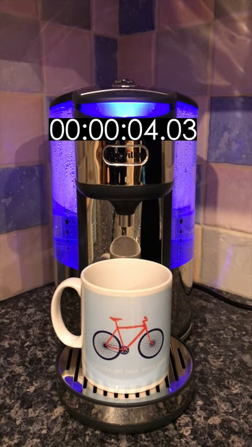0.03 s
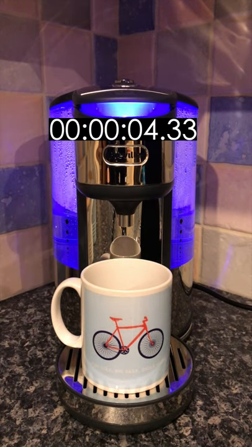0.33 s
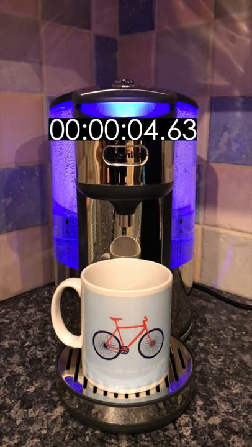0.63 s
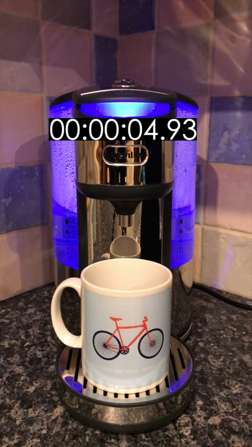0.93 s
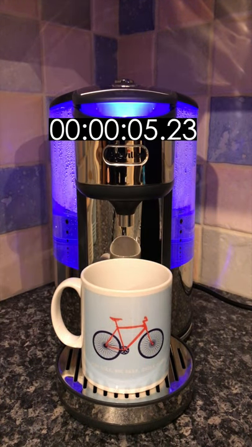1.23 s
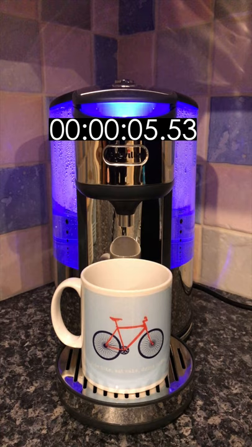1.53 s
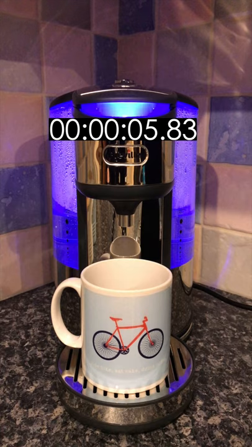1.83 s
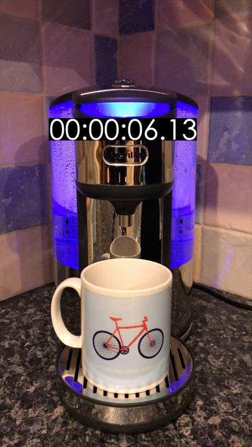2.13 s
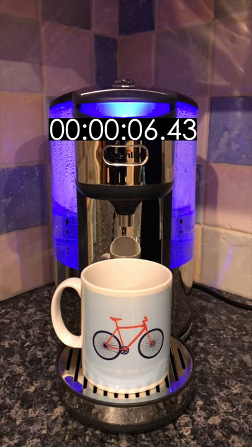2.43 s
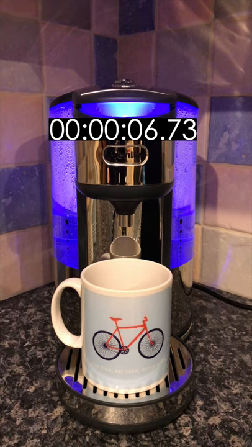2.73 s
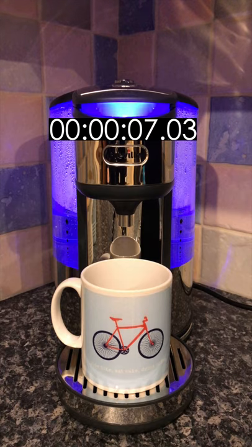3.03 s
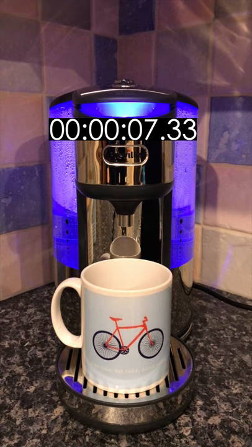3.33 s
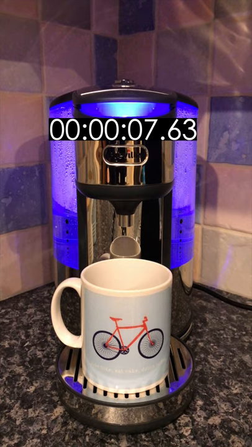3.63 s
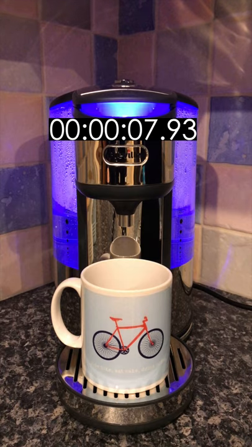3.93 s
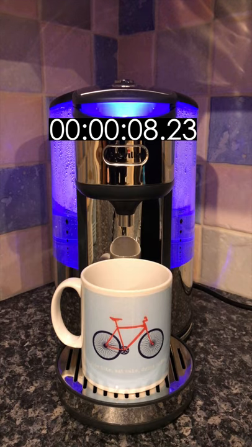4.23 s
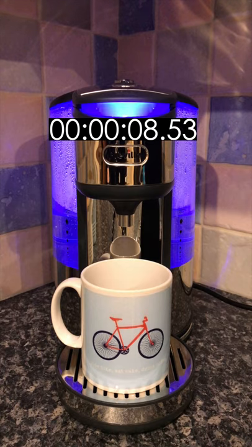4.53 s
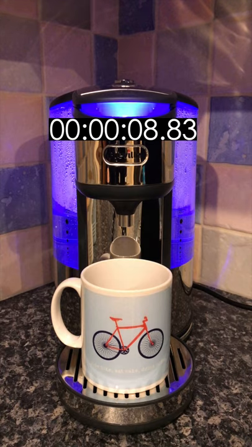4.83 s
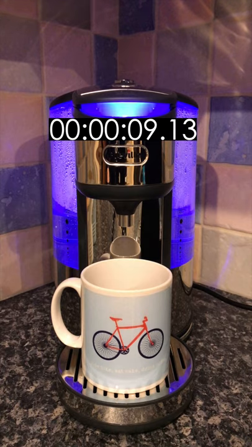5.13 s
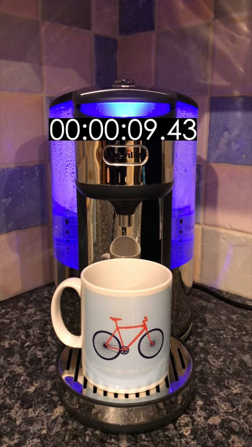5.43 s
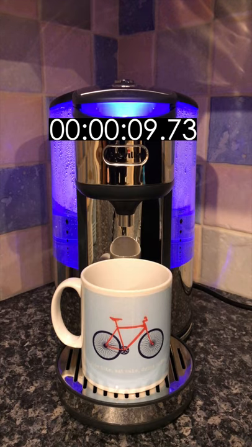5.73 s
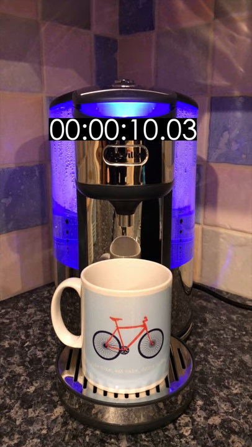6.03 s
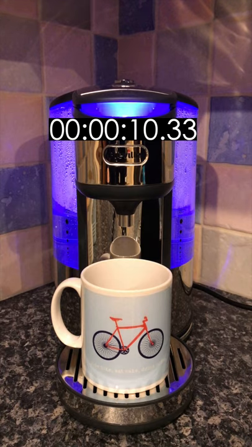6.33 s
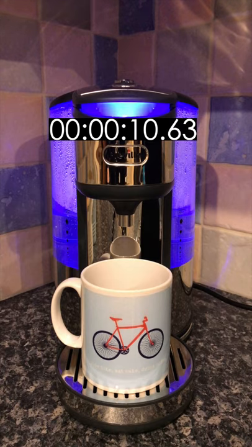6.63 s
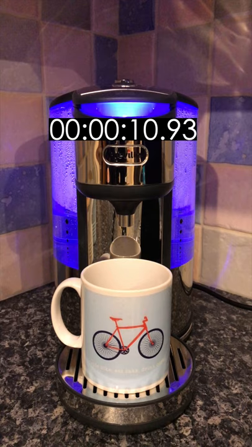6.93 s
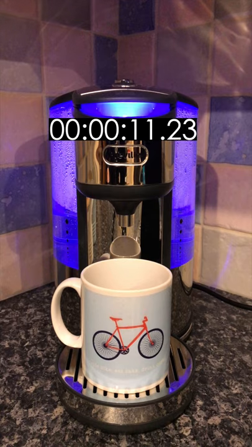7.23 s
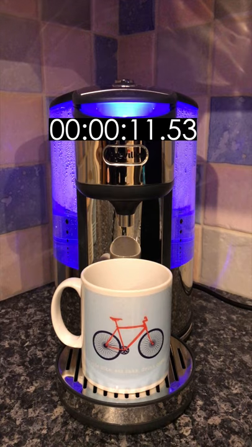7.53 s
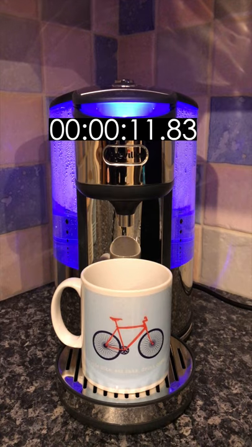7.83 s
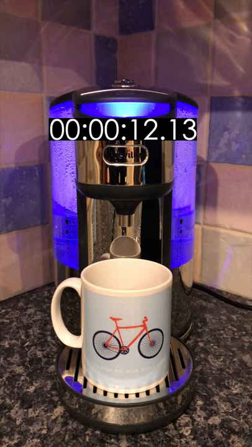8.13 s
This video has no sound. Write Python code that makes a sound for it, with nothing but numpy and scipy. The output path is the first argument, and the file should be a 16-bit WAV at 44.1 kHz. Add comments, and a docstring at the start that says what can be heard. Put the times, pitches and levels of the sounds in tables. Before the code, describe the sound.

Heard close up, a hot water dispenser starts with a thin fizz over the faint air and appliance hum of a kitchen. Small pops and a slight tick come through as the bubbling thickens, joined by soft low thumps in the water. The sound swells into a dense, steady rush and hiss with a light ring from the tank.

```python
"""A hot water dispenser heats up with a swelling rush. Steam bubbles collapse on its heating
element and make the tank ring: fine ones first, then ever more and larger ones.
Now and then a big bubble pops, thumps or blips. The warming case gives one faint squeak
and a tick. Behind it all are the air and hum of a quiet kitchen."""
import sys
import numpy as np
from scipy import signal
from scipy.fft import rfft, irfft, next_fast_len
from scipy.io import wavfile
from scipy.ndimage import uniform_filter1d, map_coordinates

SR = 44100
rng = np.random.default_rng(int(sys.argv[2]) if len(sys.argv) > 2 else 0)


def file_out(sig):
    """Save sig as 16-bit WAV at sys.argv[1]."""
    # one column per channel
    cols = np.atleast_2d(sig).T
    # limit, then scale
    lim = np.clip(cols, -1, 1)
    pcm = np.round(lim * 32767).astype(np.int16)
    wavfile.write(sys.argv[1], SR, pcm)


N = 365588


def amp(db):
    """Turn decibels (dB) into a number to multiply a sound by."""
    return 10 ** (np.asarray(db) / 20)


def unit(x):
    """Scale a sound so that its average power is 1."""
    return x / np.sqrt(np.mean(x ** 2) + 1e-20)


def along(points, hz):
    """Read between (Hz, value) points, giving each octave equal room."""
    point_hz, values = np.transpose(points)
    return np.interp(np.log(hz + 1), np.log(point_hz + 1), values)


def wobble(rate):
    """A smooth curve through `rate` random values a second."""
    values = rng.standard_normal(int(N * rate / SR) + 4)
    return map_coordinates(values, [np.arange(N) * rate / SR])


def coloured(x, gain):
    """Make each frequency in x louder or softer by gain(hz)."""
    size = 2 * next_fast_len(len(x) // 2 + SR // 8)
    cepstrum = irfft(np.log(np.maximum(gain(np.fft.rfftfreq(size, 1 / SR)), 1e-6)))
    # these two lines make the ringing follow each kick, never come before it
    cepstrum[1:size // 2] *= 2
    cepstrum[size // 2 + 1:] = 0
    return irfft(rfft(x, size) * np.exp(rfft(cepstrum)), size)[:len(x)]


def band(hz, low_hz, high_hz, order=6):
    """A gain that fades out below low_hz and above high_hz."""
    return ((1 + (low_hz / (hz + 1)) ** (2 * order)) * (1 + (hz / high_hz) ** (2 * order))) ** -.5


def add(track, start_s, db, sound):
    """Mix a sound into the track; db is the level of its loudest 10 ms."""
    power = uniform_filter1d(sound ** 2, size=SR // 100, mode="constant").max()
    part = track[round(start_s * SR):][:len(sound)]
    part += (amp(db) * sound / np.sqrt(power))[:len(part)]


def kitchen():
    """Still air, and appliances whose hum wavers a little."""
    # The tone of the air. Each row: frequency in Hz, relative level in dB.
    air_tone = [(30, -40), (45, -6.5), (60, -10), (88, -18), (108, -4), (125, -6.5), (200, -8.5),
                (350, -6.5), (800, -10), (2000, -16.5), (4000, -24.5), (7000, -29), (10500, -32),
                (15500, -33)]
    # The hum of the appliances. Each row: pitch in Hz, level in dB.
    hum_notes = [(48.4, -79), (101.5, -68), (140, -68.5), (285.3, -70.5), (802, -79), (1900, -89),
                 (2003, -78), (2304, -89), (3042, -85), (6080, -89)]
    t = np.arange(N) / SR
    air = unit(coloured(rng.standard_normal(N), lambda hz: amp(along(air_tone, hz))))
    hum = sum(amp(db + 3.0 * wobble(3.96)) * np.sin(2 * np.pi * hz * t + .5 * wobble(13))
              for hz, db in hum_notes)
    return amp(-62.0 + 0.15 * wobble(1.95)) * air + hum


def warming_case():
    """The case shifts as it warms: a thin rising squeak, later a dry tick."""
    out, t = np.zeros(N), np.arange(SR // 10) / SR
    pitch = 13200 - 550 * np.exp(-t / .016) + 900 * rng.standard_normal(len(t))
    squeak = np.sin(2 * np.pi * np.cumsum(pitch) / SR) * np.exp(-((t - .019) / .016) ** 2)
    add(out, start_s=2.357, db=-73, sound=squeak)
    crack = rng.standard_normal(len(t)) * amp(-60 * t / .04)
    tick = coloured(crack, lambda hz: band(hz, 4500, 7500, order=2))
    add(out, start_s=3.814, db=-52.5, sound=tick)
    return out


def tank(kicks, low_hz, high_hz, ripple_db=1.93):
    """Kicks of pressure in the water, heard through the ringing tank from low_hz to high_hz."""
    # What the tank wall lets out. Each row: frequency in Hz, level in dB.
    wall = [(70, -43), (105, -16), (245, -18.5), (290, -11), (500, -12), (1000, -13), (2000, -14),
            (2700, -17), (4000, -20), (4700, -26), (6200, -27), (10400, -37), (13000, -38.5), (15500, -45)]
    # Where the tank and its case ring. Each row: pitch in Hz, width in Hz, boost in dB.
    rings = [(172.7, 31, 7), (331.1, 30, 11), (382, 18.5, 7), (413, 33, 7), (451.7, 50, 7), (601, 28, 3.5),
             (763, 131, 10), (1078, 59, 7), (1226, 140, 10), (1353, 81, 9), (1473, 74, 9),
             (1657, 133, 10.5), (1934, 190, 10), (2244, 140, 5.5), (2555, 52, 4.5), (2900, 94, 7),
             (3193, 110, 6), (3383, 150, 7.5), (3608, 210, 6.5), (3820, 93, 4.5), (4048, 120, 7),
             (4400, 100, 2), (5730, 920, 4), (7220, 310, 3.5), (8320, 400, 5.5), (8770, 280, 5.5),
             (9330, 920, 3)]
    grid = np.arange(0, SR / 2, 2)
    ring_db = sum(boost * 2 ** -((2 * (grid - pitch) / width) ** 2) for pitch, width, boost in rings)
    # high up, countless small resonances crowd together and make the tone uneven
    crowd = unit(signal.fftconvolve(rng.standard_normal(len(grid)), np.hanning(41), "same"))
    db = along(wall, grid) + ring_db + ripple_db * crowd * np.clip(grid / 6000, 0, 1.7)
    return coloured(kicks, lambda hz: np.interp(hz, grid, amp(db)) * band(hz, low_hz, high_hz))


def pops():
    """Big bubbles burst into clusters of collapses that ring the tank."""
    # Each row: start in seconds, level in dB, upper edge of the pop's sound in Hz.
    bursts = [(1.611, -54, 4000), (1.674, -54.5, 4500), (1.767, -57, 4500), (1.821, -51, 4000),
              (1.913, -47.5, 4200), (2.131, -49, 900), (2.216, -47.5, 2000), (2.408, -51, 500),
              (2.593, -45, 1000), (3.028, -43, 810), (3.086, -42, 595), (3.436, -41.5, 1310),
              (3.497, -35, 1500), (3.556, -38, 800), (3.649, -34.5, 1280), (3.7363, -26.5, 1800),
              (4.173, -31.5, 1290), (4.444, -31, 1200), (4.545, -33, 1200), (5.109, -33, 2200),
              (6.574, -24.5, 1990)]
    out, t = np.zeros(N), np.arange(SR // 5) / SR
    for start_s, db, edge_hz in bursts:
        fade_s = 0.075 * (1000 / edge_hz) ** .75  # a duller pop is a bigger bubble and lasts longer
        cluster = rng.standard_normal(len(t)) * amp(-60 * t / fade_s) * (1 - np.exp(-t / 0.0004))
        add(out, start_s, db, tank(cluster, 266, edge_hz))
    return out


def thumps():
    """Large pockets of steam thump in the water, sinking in pitch as they grow."""
    # Each row: start in seconds, level in dB, pitch halfway down the slide in Hz.
    pockets = [(3.026, -51, 166), (3.653, -49, 169), (3.974, -47, 163), (4.449, -40, 168),
               (4.797, -45, 150), (4.945, -46, 126), (5.544, -43, 141.2), (6.002, -43, 168),
               (6.574, -43, 165)]
    out, t = np.zeros(N), np.arange(SR // 5) / SR
    sag = 1 + 0.38 * (np.exp(-t / 0.016) - .5)
    loudness = amp(-60 * t / 0.07) * (1 - np.exp(-t / 0.0047)) ** 2
    for start_s, db, hz in pockets:
        add(out, start_s, db, np.sin(2 * np.pi * np.cumsum(hz * sag) / SR) * loudness)
    return out


def blips():
    """Single bubbles give a tiny falling note as they swell."""
    # Each row: start in seconds, level in dB, half the length in seconds.
    bubbles = [(1.9132, -46.5, 0.0027), (4.2605, -34, 0.00084)]
    out, t = np.zeros(N), np.arange(SR // 5) / SR
    for start_s, db, half_s in bubbles:
        pitch = 1080 + 1300 * np.exp(-1.6 * t / half_s)
        loudness = np.exp(-(t / half_s - 1.35) ** 2)
        add(out, start_s, db, np.sin(2 * np.pi * np.cumsum(pitch) / SR) * loudness)
    return out


def heat_of_element():
    """How hot the element is: about 0 until the first bubbles, near 1 at full boil."""
    first_bubbles_s, full_boil_s, knee = 1.12, 7.0, 14  # a higher knee levels off more sharply
    t = np.arange(N) / SR
    rise = np.maximum((t - first_bubbles_s) / (full_boil_s - first_bubbles_s), 1 / N)
    levelled = rise / (1 + rise ** knee) ** (1 / knee)
    # only the hottest spots bubble at first, then the rest joins in
    hot_share, join_s = .76, 1.8
    joined = .5 + .5 * np.tanh((t - join_s) / .09)
    return levelled * (hot_share + (1 - hot_share) * joined)


def collapses(rate, scatter_db):
    """Collapsing bubbles kick the water at random, about `rate` times a second, some harder."""
    hits = rng.poisson(np.maximum(rate, 1) / SR, N)
    kicks = np.sqrt(hits / np.maximum(rate, 1)) * rng.choice([-1, 1], N)
    return unit(kicks * amp(scatter_db * np.clip(rng.standard_normal(N), -2, 2)))


def steel_element(kicks):
    """The finest bubbles make the steel element itself ping."""
    # Where the steel rings. Each row: pitch in Hz, width in Hz, relative level in dB.
    rings = [(3630, 170, -6), (4340, 180, 2), (5200, 110, -14), (5520, 220, -5), (5985, 130, -12)]
    return coloured(kicks, lambda hz: sum(amp(db) / (1 + (2 * (hz - pitch) / width) ** 2)
                                          for pitch, width, db in rings))


def boiling():
    """Larger bubbles sound lower. More heat brings more bubbles, and the large ones gain most."""
    heat = heat_of_element()
    doublings, density = np.log2(heat), heat ** .82
    # each level: dB at full boil, plus dB for each doubling of the heat
    rumble_db = -46 + 13 * doublings
    large_db = -28 + 13 * doublings
    medium_db = -25.5 + 10.5 * doublings
    fine_db = -35 + 8 * doublings
    hiss_db = -52.5 + 10.5 * doublings
    clouds = wobble(28) + .5 * wobble(80)  # bubbles leave the element in clouds
    spurts = amp(2.4 * np.exp(-(density / .17) ** 2) * wobble(75))  # the very first come in spurts
    lumps = amp(2.5 * (1 - heat) * wobble(18))  # large ones bunch up while they are few
    big = collapses(4600 * density, scatter_db=3.5)
    small = collapses(7500 * density, scatter_db=3.0)
    tiny = collapses(14000 * density, scatter_db=2.0)
    large = amp(large_db) * lumps * unit(tank(big * amp(0.74 * clouds), 235, 817))
    medium = amp(medium_db) * unit(tank((big + 0.95 * small) * amp(0.62 * clouds), 923, 2795))
    fine = amp(fine_db) * unit(tank((tiny + .5 * small) * amp(0.32 * clouds), 2930, 6830))
    pings = unit(steel_element(collapses(5000 * density, scatter_db=3.5)))
    sizzle = amp(np.minimum(fine_db - 6.5, -58.5)) * pings  # comes early and soon levels off
    hiss = amp(hiss_db) * unit(tank(collapses(45000 * density, scatter_db=2.0), 7000, 20000))
    # the water itself rumbles under the largest bubbles
    rumble = amp(rumble_db) * unit(tank(collapses(260 * density, scatter_db=2), 70, 228))
    return spurts * (large + medium + fine + sizzle + hiss + rumble)


def scene():
    """The dispenser close by in its kitchen, as one channel."""
    return (boiling() + pops() + thumps() + blips() + warming_case() + kitchen())[None]


def record(dry):
    """Cut away the very highest treble."""
    top_hz = 15720
    size = next_fast_len(N + SR // 2)
    return irfft(rfft(dry, size) * (np.fft.rfftfreq(size, 1 / SR) < top_hz), size)[..., :N]


dry = scene()
out = record(dry)
file_out(out)
```